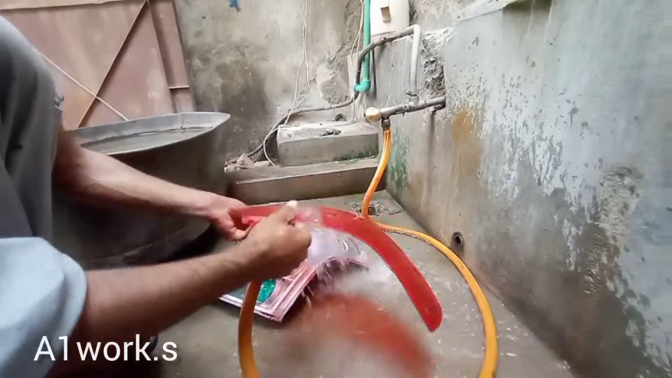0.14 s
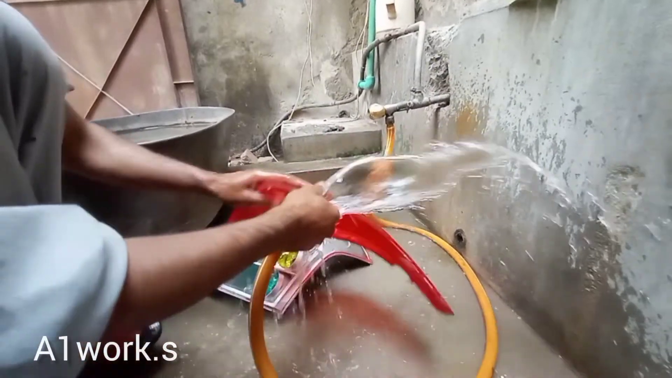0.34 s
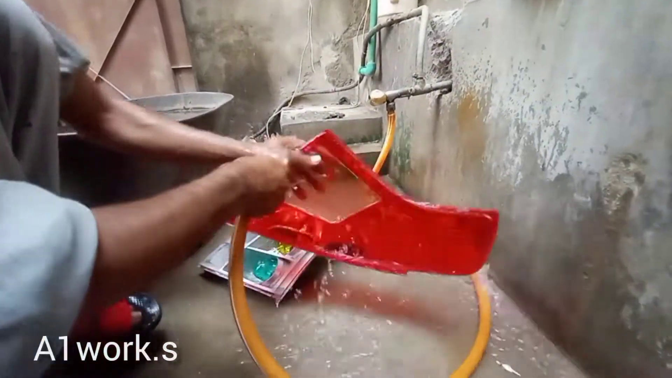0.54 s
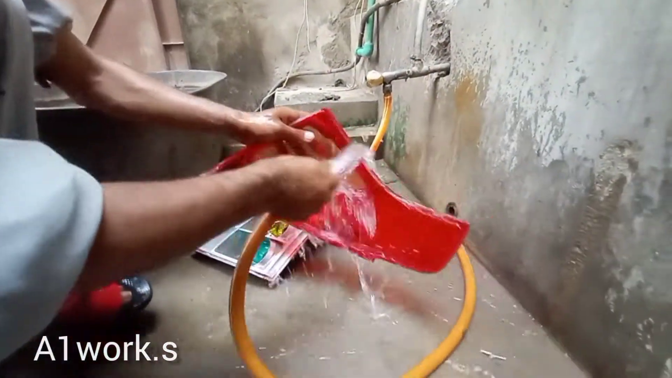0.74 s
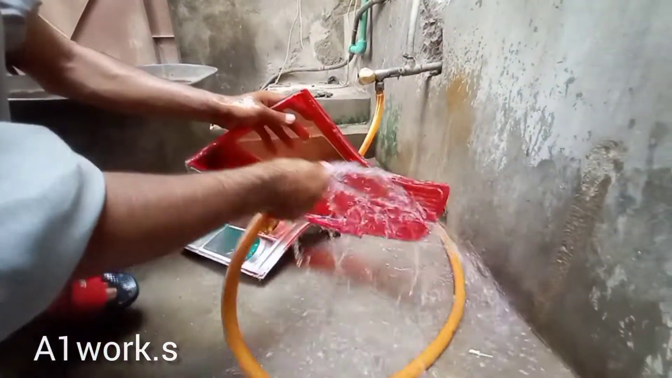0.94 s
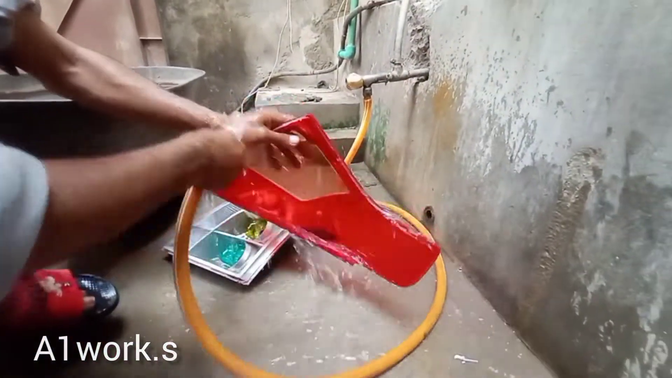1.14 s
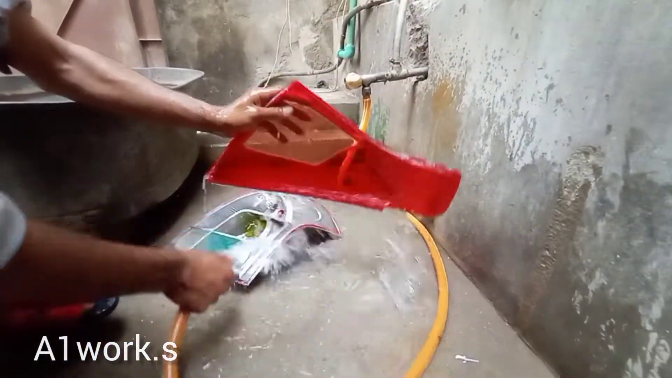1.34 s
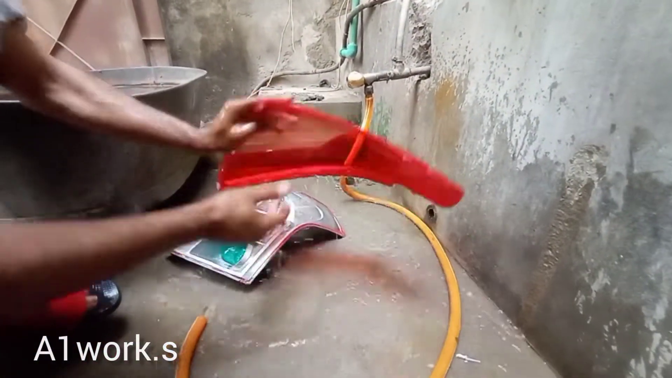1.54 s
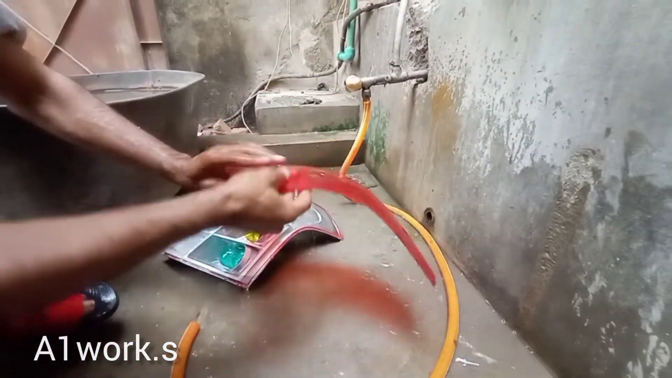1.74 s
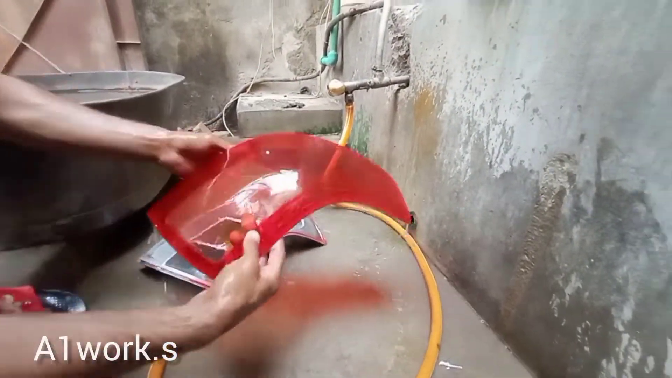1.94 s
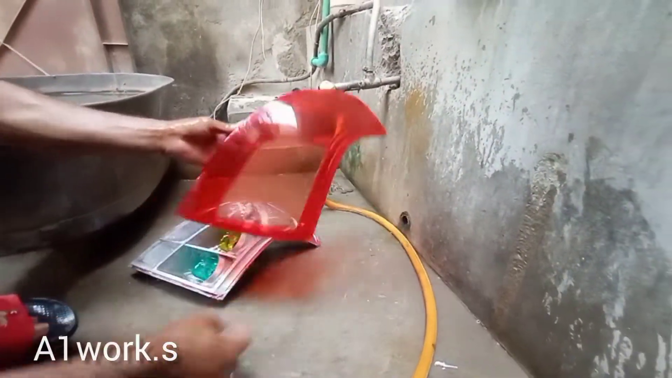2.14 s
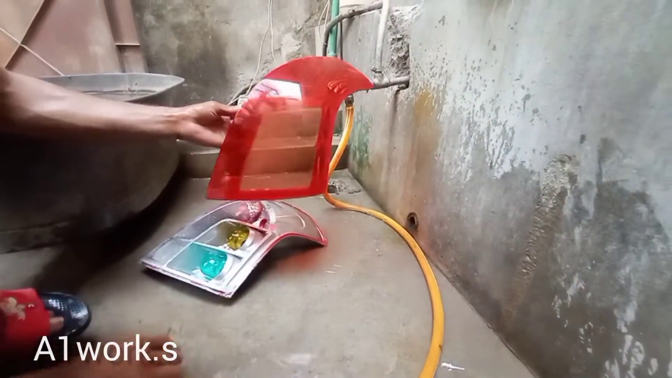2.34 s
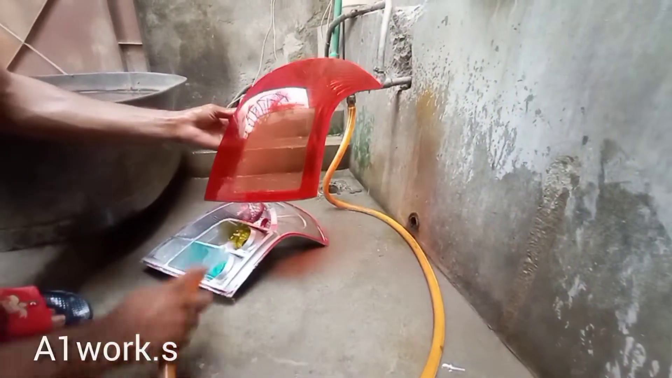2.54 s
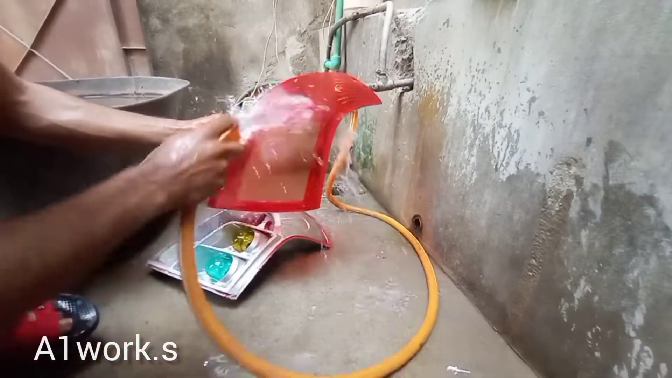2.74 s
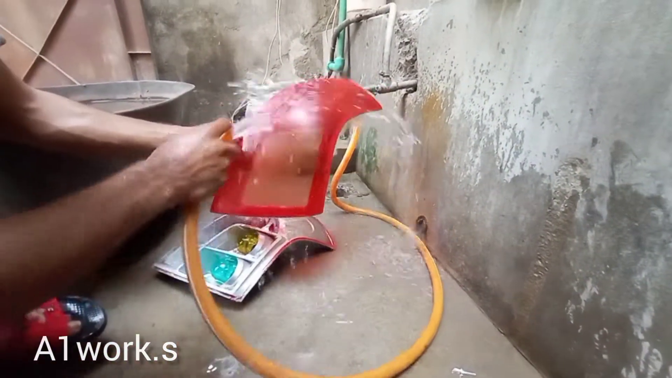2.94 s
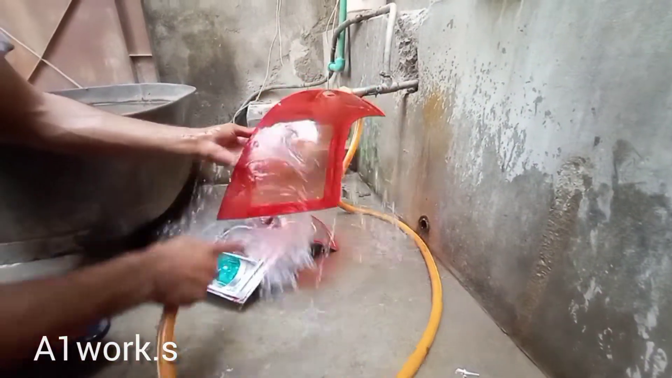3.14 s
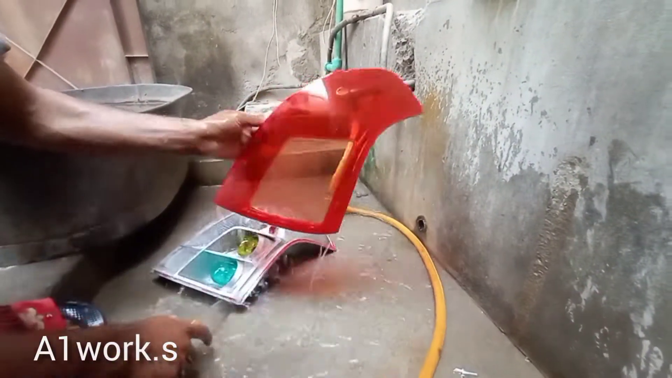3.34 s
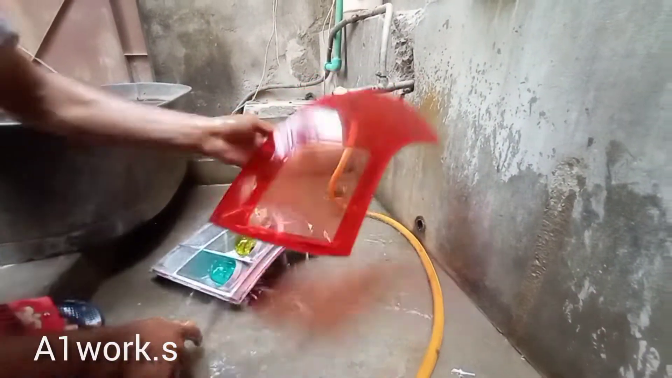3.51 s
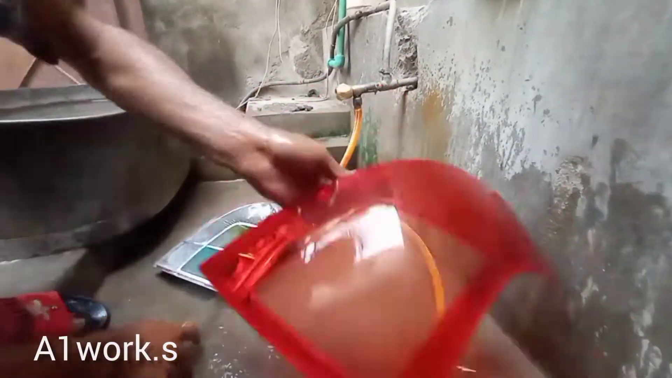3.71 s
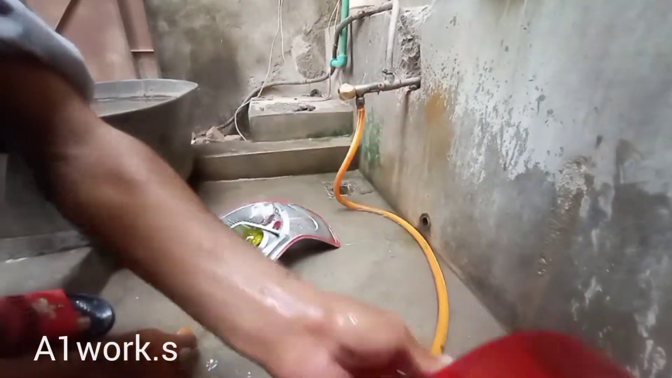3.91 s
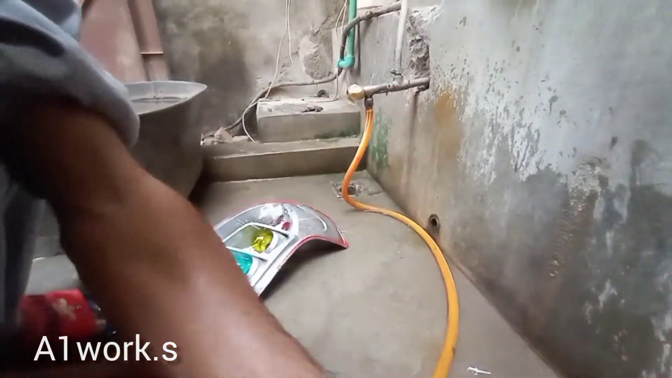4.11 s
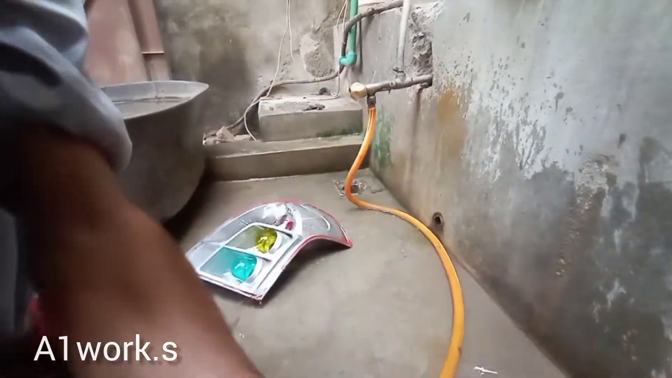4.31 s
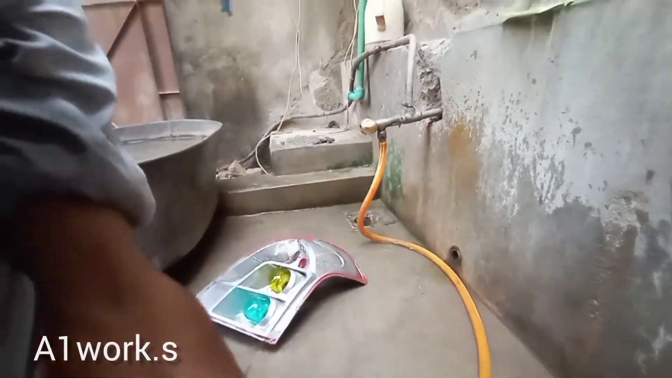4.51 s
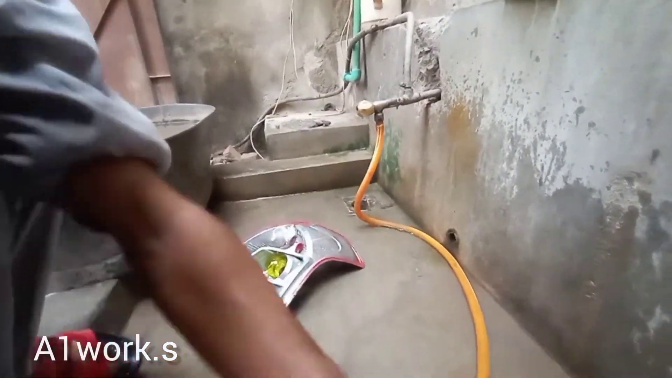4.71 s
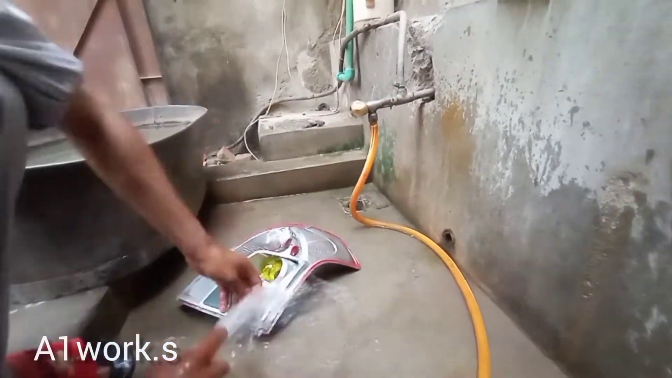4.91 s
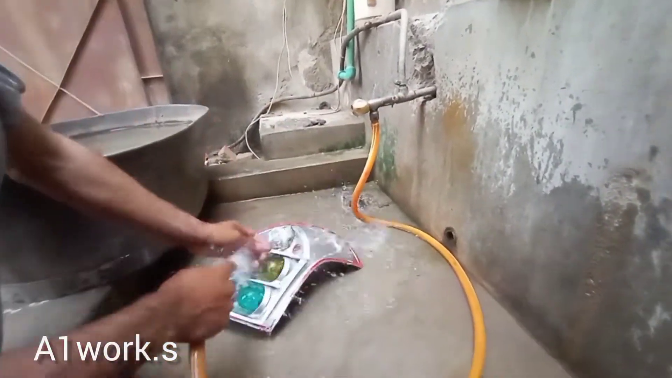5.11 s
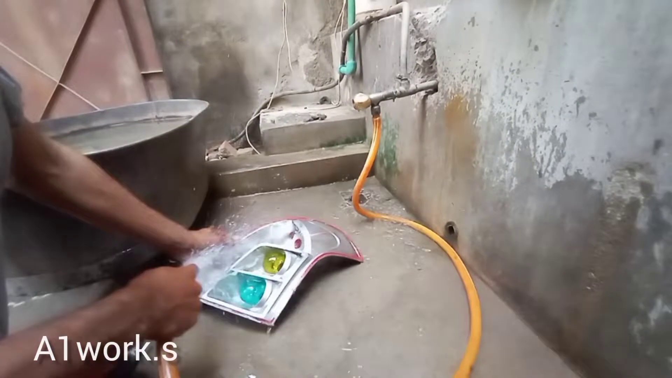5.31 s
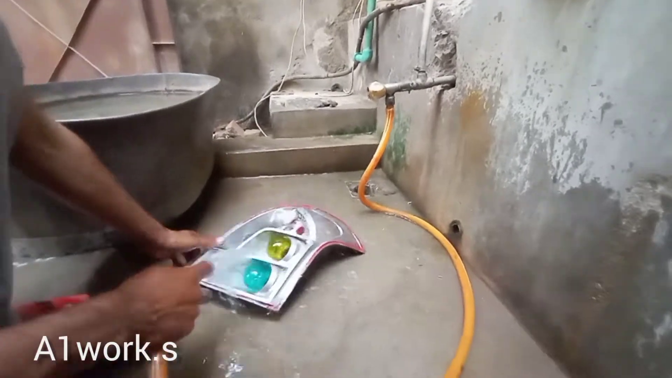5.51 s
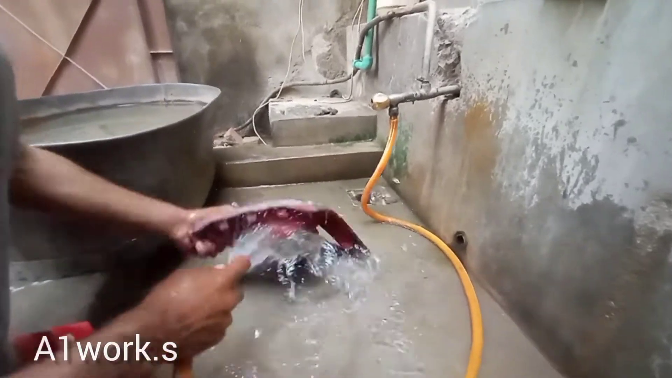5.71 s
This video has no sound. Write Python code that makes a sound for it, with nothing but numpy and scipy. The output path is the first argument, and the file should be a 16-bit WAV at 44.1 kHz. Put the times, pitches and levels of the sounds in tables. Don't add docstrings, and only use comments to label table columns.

```python
import sys
import numpy as np
from scipy import signal
from scipy.fft import rfft, irfft, next_fast_len
from scipy.io import wavfile
from scipy.ndimage import uniform_filter1d, map_coordinates

SR = 44100
rng = np.random.default_rng(int(sys.argv[2]) if len(sys.argv) > 2 else 0)


def generate_wav(signal):
    frames = np.transpose(np.atleast_2d(signal))
    scaled = np.clip(frames, -1, 1) * 32767
    pcm = np.round(scaled).astype(np.int16)
    wavfile.write(sys.argv[1], SR, pcm)


def invert_db(x):
    u = np.asarray(x, float) / 20
    return 10 ** u


N = 258426

# (time [s], flow [dB], slosh relative to flow [dB])
JET_FLOW = [(0, -47, -1.5), (.25, -58, 1.5), (.47, -51, -5.5), (.68, -57, 2), (.86, -47, -6.5),
            (1.13, -58.5, -1), (1.37, -47.5, 1), (1.62, -65, 3.5), (2.6, -64.5, 1.5), (3.1, -48.5, 0),
            (3.58, -66.5, 0), (4.3, -66, 1.5), (4.6, -72, 9), (4.96, -51, -2), (5.5, -48.5, 5.5),
            (5.61, -60, 8), (5.75, -44, -4.5), (5.86, -52, 11)]
# (frequency [Hz], level per Hz [dB])
SPRAY_COLOUR = [(1290, -33.5), (2200, -16), (2600, -8.5), (2840, -3.5), (3910, 0), (4600, -4.5), (5400, -1),
                (5990, 0), (6710, -4.5), (7600, -14), (9880, -42), (16700, -120)]
# (frequency [Hz], level per Hz [dB])
SLOSH_COLOUR = [(700, -17), (1100, -15), (1350, -6.5), (2200, -2.5), (3200, -10), (5000, -36)]
# (frequency [Hz], level per Hz [dB])
MIST_COLOUR = [(7300, -29), (7800, -6.5), (8500, -8.5), (9300, -22.5), (10500, -14), (11400, -16.5),
               (12200, -4), (13800, 0.5), (15100, 4), (15900, -4)]


def unit(x):
    return x / np.sqrt(np.mean(x ** 2) + 1e-20)


def along(points, hz):
    f, value = np.transpose(points)
    return np.interp(np.log(hz + 1), np.log(f + 1), value)


def curves(rows):
    s, *columns = np.transpose(rows)
    return [np.interp(np.arange(N) / SR, s, column) for column in columns]


def wobble(rate):
    knots = rng.standard_normal(int(N * rate / SR) + 4)
    return map_coordinates(knots, [np.arange(N) * rate / SR])


def filtered(x, response):
    m = next_fast_len(N + 8192)
    return irfft(rfft(x, m) * response(np.fft.rfftfreq(m, 1 / SR)), m)[:N]


def modes(table):
    def response(f):
        total = 0
        for k, (centre, width, db) in enumerate(table):
            loss = 1j * f * width
            total = total + (-1) ** k * invert_db(db) * loss / (centre * centre - f * f + loss)
        return total
    return response


def sharp(table):
    return lambda f: modes(table)(f) ** 2


def colour(points):
    return lambda f: invert_db(along(points, f)) * (f > points[0][0]) * (f < points[-1][0])


def rush(response, patchy_db, size=512, count=3):
    z = signal.stft(rng.standard_normal(N), nperseg=size)[2]
    patches = uniform_filter1d(rng.standard_normal(z.shape), 6, 0)
    patches = unit(uniform_filter1d(patches, count, 1))
    noise = signal.istft(z * invert_db(patchy_db * patches), nperseg=size)[1][:N]
    return unit(filtered(noise, response))


def steady(x, share):
    envelope = np.abs(signal.hilbert(x, next_fast_len(N))[:N] + 1e-9)
    return unit(x / envelope ** np.clip(share, 0, 1))


def held(rows, attack, release):
    s, length, *levels = np.transpose(rows)[:, :, None]
    t = np.arange(N) / SR - s
    shape = np.clip(t / attack, 0, 1) * np.exp(-np.clip(t - length, 0, None) / release)
    return [np.max(invert_db(db) * shape, axis=0) for db in levels]


def burst(s, db, t60, rise, hold=1):
    t = np.arange(SR // 8) / SR
    fall = invert_db(db - 60 * (t / max(t60, .005)) ** hold)
    return round(s * SR), t, fall * (1 - np.exp(-t / rise))


def droplets(count, hz, spread, cycles, scatter_db):
    when, pitch, size = rng.random((count, 3)).T
    f = hz * np.exp(spread * 2 * (pitch - .5))[:, None]
    turns = np.arange(400) / SR * f
    ring = np.sin(2 * np.pi * turns * (1 + 0.0049 * turns))
    ring *= np.exp(-turns / cycles) * (1 - np.exp(-turns))
    ring *= invert_db(-scatter_db * np.log(size + 1e-9))[:, None]
    at = (when * N).astype(int)[:, None] + np.arange(400)
    return unit(np.bincount(at.ravel(), ring.ravel(), N + 400)[:N])


def mistiness():
    mist_db, knee_db, thins = -11.5, -58.5, 1.23
    return mist_db + thins * np.minimum(curves(JET_FLOW)[0] - knee_db, 0)


def yard(x):
    # (frequency [Hz], time to fall 60 dB [s])
    echo_times = [(300, 0.21), (2000, 0.08), (8000, 0.11)]
    hz, t, z = signal.stft(rng.standard_normal(SR // 4), SR, nperseg=256)
    fade = invert_db(-60 * t / along(echo_times, hz)[:, None])
    tail = signal.istft(z * fade, SR, nperseg=256)[1]
    late = np.pad(x, (200, 0))
    return signal.fftconvolve(late, tail / np.linalg.norm(tail))[:N]


def pump():
    # (time [s], length [s], hum level [dB])
    surges = [(0, .15, -53.5), (.25, 0.42, -53), (.82, 0.14, -63), (.95, .3, -53.5), (1.45, 0.28, -59.5),
              (1.76, 0.21, -56), (2.13, 0.32, -57), (2.55, .2, -64), (2.8, .3, -59), (3.16, 0.16, -55),
              (3.42, 0.11, -58.5), (3.63, 0.37, -53.5), (4.2, 0.14, -60.5), (4.42, .35, -51.5),
              (4.88, 0.19, -59.5), (5.1, 0.12, -49), (5.28, 0.33, -51), (5.62, 0.079, -67)]
    # (frequency [Hz], width [Hz], level [dB])
    hum_peaks = [(144.67, 5.6, 2.5), (168.3, 72, -9.5)]
    # (frequency [Hz], level per Hz [dB])
    rumble_colour = [(15, -71), (25, -48), (79, -12.5), (113, -9), (145, -7), (204, -15.5), (273, -15),
                     (300, -27), (390, -57), (660, -120)]
    # (frequency [Hz], level per Hz [dB])
    whir_colour = [(440, -39), (750, -20), (839, -11), (967, -62), (1280, -21), (1350, -59), (1480, -39),
                   (1570, -10), (1890, 2.5), (2160, 5), (2590, -21), (3140, 1.5), (4390, -18.5), (5660, -1),
                   (8500, -66), (11000, -69), (18700, -120)]
    # (frequency [Hz], width [Hz], level [dB])
    whine_peaks = [(1970, 57, -7), (2200, 170, 1)]
    # (frequency [Hz], width [Hz], level [dB])
    pipe_peaks = [(330, 61, -6.5), (490, 125, -4.5), (615.3, 95, 0.5), (1140, 154, -4)]

    t = np.arange(N) / SR
    idle_db = -70
    hum_db = 20 * np.log10(held(surges, attack=0.018, release=0.011)[0] + invert_db(idle_db))
    rumble_db = -66 + 0.37 * (hum_db + 56) + 0.7 * t
    whir_db = -61 + 0.5 * wobble(1.5)
    full_db, drained_db, drains_s, drain_time_s = -66.5, -76, 2.02, 0.18
    pipe_db = drained_db + (full_db - drained_db) / (1 + np.exp((t - drains_s) / drain_time_s))

    hum = steady(rush(sharp(hum_peaks), patchy_db=0.0, size=4096), share=0.28)
    hum *= invert_db(hum_db - 2.0 + 2.26 * wobble(11))
    dull = lambda f: colour(rumble_colour)(f) / (1 + (f / 120) ** 4)
    rumble = invert_db(rumble_db + 3.5 + 2.3 * wobble(20)) * rush(dull, patchy_db=2.5, size=4096)
    whir = rush(colour(whir_colour), patchy_db=5.5, size=512, count=17)
    whir = invert_db(whir_db - 1.5) * (whir + 0.68 * rush(sharp(whine_peaks), patchy_db=-2.0))
    pipe = invert_db(pipe_db + 4) * rush(sharp(pipe_peaks), patchy_db=4.0, size=2048)
    return hum + rumble + whir + pipe


def housing():
    # (time [s], length [s], cavity level [dB], wall level [dB])
    drumming = [
        (5.585, 0.028, -41, -46.5),
        (5.635, 0.021, -51, -41),
        (5.697, 0.038, -68, -44),
        (5.745, 0.032, -44.5, -38.5),
        (5.785, 0.038, -42, -36),
        (5.838, 0.015, -65, -37),
    ]
    # (frequency [Hz], width [Hz], level [dB])
    cavity_peaks = [(494, 58, 0)]
    # (frequency [Hz], width [Hz], level [dB])
    wall_peaks = [(310, 150, -13.5), (803, 196, -11), (1308, 186, 5), (1450, 434, -4), (2380, 82, -8.5)]
    boom, rattle = held(drumming, attack=0.0033, release=0.017)
    cavity = boom * steady(filtered(rng.standard_normal(N), sharp(cavity_peaks)), share=0.4)
    walls = steady(rush(modes(wall_peaks), patchy_db=5.0), share=0.5)
    return cavity + rattle * invert_db(0.38 * wobble(60)) * walls


def knocks():
    # (time [s], peak [dB], click relative to peak [dB], time to fall 60 dB [s])
    contacts = [(4.362, -31.5, -16.5, 0.031), (4.366, -27, -27, 0.012), (4.418, -36.5, -20.5, 0.077),
                (4.458, -30.5, -33, 0.039), (4.464, -28.5, -20, 0.029), (4.474, -42, -31, 0.039),
                (4.493, -42, -9, 0.11), (4.528, -28.5, -18.5, 0.055), (4.55, -35.5, -31, 0.069),
                (4.441, -52.5, 1, 0.075), (4.574, -50, -20, 0.19), (5.577, -28.5, -25, 0.037)]
    # (frequency [Hz], width [Hz], level [dB])
    shell_peaks = [(297, 370, -12), (500, 25, 2.5), (605, 60, -1.5), (794, 132, 4.5), (957, 86, 5),
                   (1220, 100, 7.5), (1500, 200, 1), (1766, 140, 0), (2050, 81, -4.5), (2350, 92, 1),
                   (3170, 870, -14.5)]
    push, click = np.zeros((2, N + SR))
    for s, db, click_db, t60 in contacts:
        i, t, shape = burst(s, db, t60, rise=0.00093, hold=1.206)
        push[i:][:len(t)] += shape
        click[i:][:len(t)] += shape * invert_db(click_db)
    chatter = push[:N] * steady(rng.standard_normal(N), share=1.0)
    body = lambda f: modes(shell_peaks)(f) + 0.067 / (1 + (f / 2500) ** 4) * (f > 350)
    shell = filtered(chatter, body)
    scrape = rush(colour(SPRAY_COLOUR), patchy_db=-5.5) + 0.12 * rush(colour(MIST_COLOUR), patchy_db=-1.0)
    return invert_db(7.5) * shell + invert_db(-0.5) * click[:N] * scrape


def glugs():
    # (time [s], peak [dB], pitch [Hz], time to fall 60 dB [s])
    pockets = [(0.4706, -42.5, 2290, 0.073), (0.833, -47, 2000, 0.025), (1.4232, -42.5, 1506, 0.038),
               (1.4618, -43, 1260, 0.078), (2.0689, -54.5, 1705, 0.077), (2.5346, -49, 2200, 0.052),
               (2.7593, -46, 1494, 0.05), (2.8102, -52, 1590, 0.055), (2.852, -47.5, 1408, 0.064),
               (2.911, -45, 2155, 0.063), (2.9502, -39.5, 1500, 0.046), (3.0205, -50, 2170, 0.06),
               (3.1443, -43.5, 1720, 0.037), (3.1693, -47, 1957, 0.059), (3.237, -48, 2080, 0.055),
               (3.4428, -53, 1530, 0.047), (5.1358, -43.5, 1640, 0.035), (5.226, -32.5, 2430, 0.021),
               (5.277, -39.5, 1497, 0.061), (5.3754, -36.5, 1530, 0.04), (5.4234, -46, 1523, 0.078),
               (5.6404, -48, 1340, 0.028)]
    # (time [s], peak [dB], pitch [Hz])
    gulps = [(.188, -46.5, 850), (.314, -65.5, 335), (.68, -63.5, 335), (.825, -54, 344), (.909, -63, 347),
             (1.234, -50, 550), (1.399, -53, 980), (1.489, -56, 341), (2.005, -63, 835), (2.076, -58, 500),
             (2.275, -66, 344), (2.606, -51, 955), (2.721, -61.5, 330), (2.812, -51, 820),
             (2.947, -44.5, 830), (3.324, -61, 329), (3.37, -57.5, 626), (3.49, -64.5, 390),
             (4.116, -58.5, 667), (4.975, -59, 846), (5.149, -54.5, 496), (5.28, -50, 870),
             (5.301, -53.5, 472), (5.385, -51.5, 528), (5.46, -52, 480)]
    large = [(s, db, hz, 0.051 + 8.9 / hz) for s, db, hz in gulps]
    out = np.zeros(N + SR)
    for s, db, hz, t60 in pockets + large:
        i, t, shape = burst(s, db, t60, rise=0.0024, hold=1.39)
        rough = np.cumsum(rng.standard_normal(len(t))) * .003 * np.sqrt(hz)
        ring = np.sin(2 * np.pi * hz * t * (1 + 1.01 * t) + rough)
        out[i:][:len(t)] += invert_db(4.0) * shape * ring
    return out[:N]


def splats():
    # (time [s], peak [dB], ring [Hz],
    # slap relative to peak [dB])
    short_slugs = [(.074, -32.5, 5980, -11), (.125, -38, 6170, -19), (.158, -37.5, 5660, -17),
                   (.284, -33.5, 5580, -24), (.313, -35.5, 5420, -29), (.332, -37, 5900, -24),
                   (.452, -35.5, 5520, -19), (.5, -35, 2970, -6), (0.759, -39, 6000, -30),
                   (0.839, -33, 5200, -9), (.865, -31, 3910, -12.5), (.916, -38, 2820, -15),
                   (.932, -36, 5450, -23), (.972, -34, 4430, -28), (1.017, -35.5, 6170, -28),
                   (1.09, -42, 3870, -16), (1.169, -41.5, 3690, -18), (1.221, -37.5, 5680, -11),
                   (1.333, -34, 3880, -10), (1.52, -40, 3930, -6), (1.585, -49, 3900, -20),
                   (1.634, -38, 6050, -13),
                   (2.319, -43.5, 3070, -7), (2.51, -40.5, 3470, -15), (2.534, -31, 3850, -5.5),
              (2.565, -35, 2560, -5), (2.725, -36, 2690, -26), (2.768, -34.5, 3610, -21),
              (2.832, -37.5, 5680, -8), (2.885, -33, 5480, -11), (2.993, -38, 5500, -9),
              (3.052, -31.5, 3950, -17), (3.077, -34.5, 5800, -29), (3.221, -38.5, 3320, -8),
              (3.278, -34.5, 3690, -4.5), (3.353, -44, 3700, -12), (3.381, -42.5, 5430, -16),
              (3.53, -44.5, 3740, -8), (3.588, -44, 5920, -14), (3.772, -47.5, 4970, -27),
              (4.092, -56, 2200, -1), (4.655, -51, 3880, -29),
                   (4.817, -43, 5740, -28), (4.9, -45, 6170, -22), (5.045, -41, 3300, 3.5),
            (5.16, -38.5, 6000, -7), (5.211, -35.5, 5900, -2), (5.282, -34, 2820, -11),
            (5.33, -44, 5700, -29), (5.398, -36, 3530, -4), (5.554, -33.5, 3730, -17),
            (5.673, -36, 2580, -19), (5.7, -44, 5900, -10), (5.728, -35, 3740, 0.5), (5.818, -38, 2400, -7)]
    # (time [s], peak [dB], ring [Hz], slap relative to peak [dB], length [s])
    gushes = [
        (1.231, -42.5, 5920, -14, .042),
        (1.283, -33.5, 3350, -8, 0.051),
        (1.411, -43, 3750, -4.5, 0.079),
        (2.493, -49, 5170, -7, 0.13),
        (3.138, -39.5, 5240, -24, 0.16),
        (3.695, -53.5, 3780, -26, 0.046),
        (4.951, -40.5, 3400, -8.5, 0.12),
        (5.088, -40.5, 5970, -25, .036),
    ]
    # (time [s], peak [dB], length [s])
    sheets = [
        (0.18, -53, 0.066),
        (2.321, -43, 0.026),
        (2.454, -41, 0.03),
        (2.756, -46.5, 0.033),
        (5.575, -33, 0.023),
        (5.634, -51, 0.025),
    ]
    puff, slap, ring = np.zeros((3, N + SR))
    slugs = [(*row, 0.021) for row in short_slugs]
    for s, db, hz, slap_db, length in slugs + gushes:
        i, t, shape = burst(s, db, length, rise=0.0013, hold=1.73)
        puff[i:][:len(t)] += shape
        slap[i:][:len(t)] += shape * invert_db(slap_db)
        rough = 0.088 * np.cumsum(rng.standard_normal(len(t)))
        ring[i:][:len(t)] += shape * np.sin(2 * np.pi * hz * t * (1 + 1.86 * t) + rough)
    for s, db, length in sheets:
        i, t, shape = burst(s, db, length, rise=0.0059, hold=2.73)
        slap[i:][:len(t)] += shape
    puff = np.roll(puff, -40)
    mist = invert_db(mistiness() - 0.5) * rush(colour(MIST_COLOUR), patchy_db=-2.0)
    wet = puff[:N] * (rush(colour(SPRAY_COLOUR), patchy_db=4.5) + mist)
    dull = slap[:N] * rush(colour(SLOSH_COLOUR), patchy_db=-3.5)
    return invert_db(-7.0) * wet + invert_db(-2.5) * dull + invert_db(-4.0) * ring[:N]


def jet():
    spray_db, slosh_db = curves(JET_FLOW)
    sputter = 0.56 * wobble(8.4) + 0.8 * wobble(45) + 1.82 * wobble(130)
    drops = droplets(count=5000, hz=4464, spread=0.537, cycles=6.4, scatter_db=2.0)
    fizz = rush(colour(SPRAY_COLOUR), patchy_db=3.5) + 0.31 * unit(filtered(drops, colour(SPRAY_COLOUR)))
    bubbles = droplets(count=1500, hz=1750, spread=0.582, cycles=8.5, scatter_db=2.5)
    slosh = rush(colour(SLOSH_COLOUR), patchy_db=2) + .5 * bubbles
    mist = rush(colour(MIST_COLOUR), patchy_db=4.0)
    water = invert_db(1.2) * fizz + invert_db(slosh_db - 4.5) * slosh + invert_db(mistiness() + 1.5) * mist
    return invert_db(spray_db + sputter) * water


def scene():
    hits = splats() + glugs() + knocks()
    return (hits + invert_db(-4.5) * yard(hits) + jet() + housing() + pump())[None]


def suppress(x, slope):
    # (frequency [Hz], threshold per bin [dB])
    thresholds = [(250, -115.5), (1000, -81.5), (2200, -78), (4000, -80.5), (7000, -83.5), (9500, -101),
                  (13000, -94)]
    hz, _, z = signal.stft(x, SR, nperseg=1024)
    power = uniform_filter1d(np.abs(z) ** 2, size=7, axis=0)
    power = uniform_filter1d(power, size=3, axis=1)
    under_db = 10 * np.log10(np.abs(power) + 1e-20) - along(thresholds, hz)[:, None]
    gain = invert_db(np.clip(slope * under_db, -18, 0))
    return signal.istft(z * gain, SR, nperseg=1024)[1][:N]


def low_pass(x):
    return signal.sosfilt(signal.butter(12, 17040, fs=SR, output="sos"), x)


def record(dry):
    clean = suppress(filtered(dry[0], lambda hz: hz < 15830), slope=0.72)
    frame = np.arange(N) / 1024
    pulse_db = 0.63 * np.cos(2 * np.pi * frame + 2.7)
    return low_pass(clean[None] * invert_db(pulse_db))


dry = scene()
out = record(dry)
generate_wav(out)
```